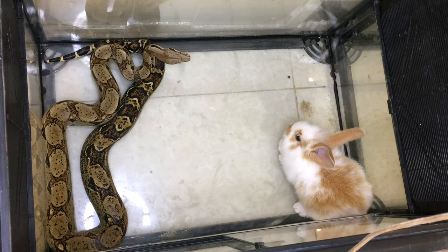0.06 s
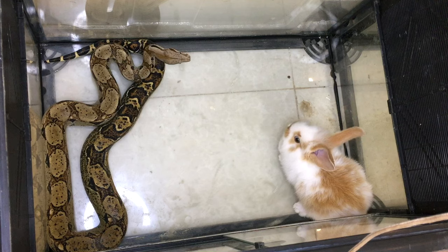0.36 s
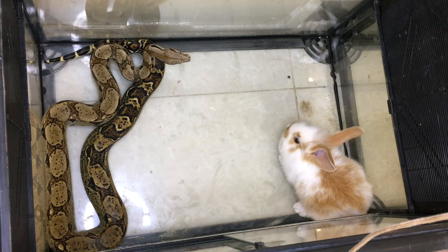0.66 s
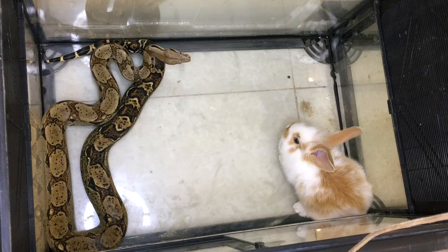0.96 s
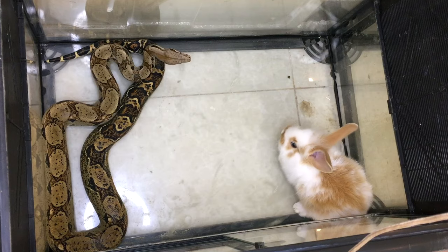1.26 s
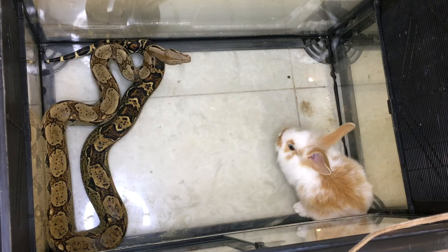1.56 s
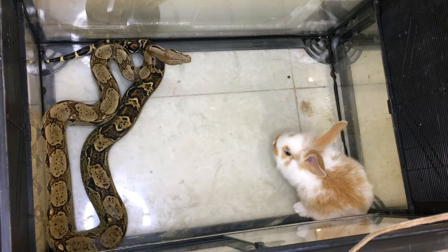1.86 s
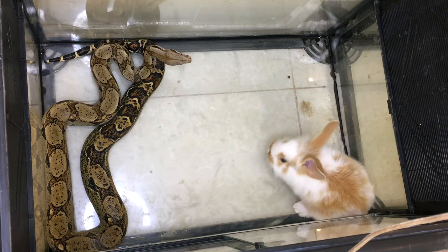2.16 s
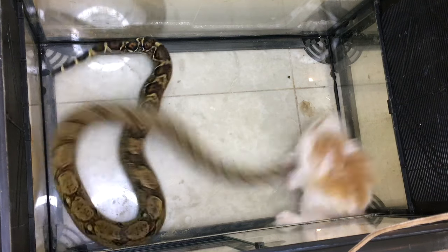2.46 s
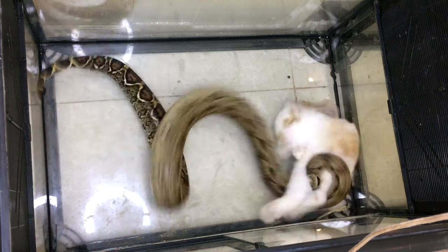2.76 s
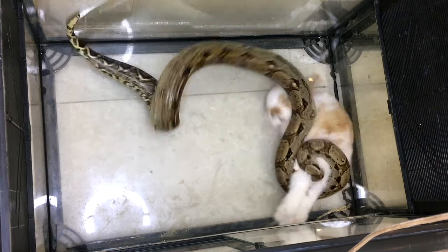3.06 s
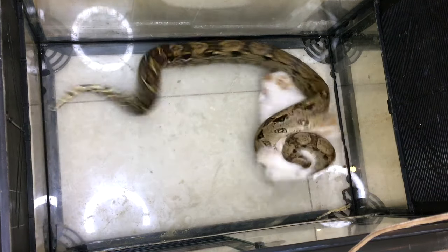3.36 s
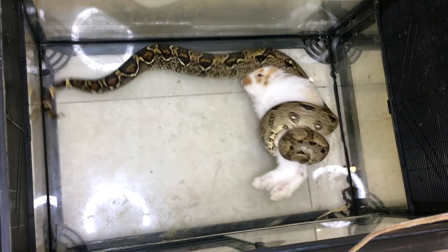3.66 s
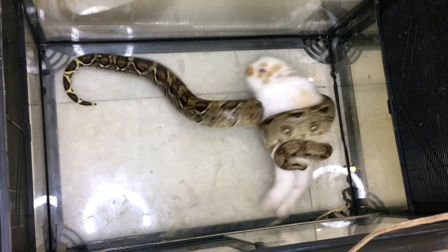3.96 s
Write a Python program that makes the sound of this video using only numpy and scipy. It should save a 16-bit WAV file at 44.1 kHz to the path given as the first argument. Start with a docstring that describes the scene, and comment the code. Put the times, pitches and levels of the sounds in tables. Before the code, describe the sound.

A rabbit squeals in a ringing glass tank. First there is only a low machine hum, then a snake strikes with quick rubbing and knocks on the panes, and three high, partly hoarse squeals follow as the hum fades.

```python
"""A low machine hum fills a room. Then a snake strikes a rabbit in a glass tank: the bodies rub
against the panes (stick-slip friction) and knock on them (impacts that excite decaying modes).
The rabbit squeals three times, its vibrating vocal folds cracking between clear, period-doubled
and hoarse, while the hum sinks away. Reflections keep the tank ringing after every sound in it."""
import sys
import numpy as np
from scipy import signal
from scipy.fft import rfft, irfft, next_fast_len
from scipy.io import wavfile
from scipy.ndimage import uniform_filter1d

SR = 44100
rng = np.random.default_rng(int(sys.argv[2]) if len(sys.argv) > 2 else 0)


def bounce(signal):
    """Save signal as a 16-bit WAV file at the path given by the first command-line argument."""
    frames = np.transpose(np.atleast_2d(signal))
    limited = np.clip(frames, -1, 1)
    pcm = np.round(limited * 32767).astype(np.int16)
    wavfile.write(sys.argv[1], SR, pcm)


N = 176400
TIME = np.arange(N) / SR

# bands of the machine hum (centre [Hz], width [Hz], level [dB])
HUM_BANDS = [(75.9, 7.6, -37.5), (117.2, 18.6, -44.5), (230.7, 8.3, -50.5)]
# spectrum of the air noise (frequency [Hz], relative level [dB])
AIR_SPECTRUM = [(25, -4.5), (60, 20.5), (265, 8.5), (400, -6.5), (2000, -14.5), (3200, -19), (16000, -30)]
# gain of hum and air together (time [s], gain [dB])
ROOM_GAIN = [(2.55, -0.5), (3.2, -16.5)]
# reverberation time of the tank (frequency [Hz], t60 [s])
TAIL_T60 = [(150, 1.5), (2700, 1.25), (6000, 2.1), (8500, 1.1), (16000, .4)]
# spectrum of its reverberation (frequency [Hz], gain [dB])
TAIL_SPECTRUM = [(650, -1), (1400, -4.5), (6300, -4), (8200, -10), (16000, -4.5)]
# low modes of the tank (frequency [Hz], relative level [dB], t60 [s])
BOOM_MODES = [(136.2, -5, 0.96), (168.4, -7, 0.69), (324, -6.5, 0.16), (612.6, -4.5, 0.22),
              (685, -14, 0.58)]
# rubbing on glass during the strike, then a soft low puff of noise under the second squeal
# (time [s], level [dB])
RUB_AND_PUFF_LEVEL = [(2.37, -67), (2.428, -41.5), (2.44, -43.5), (2.515, -29), (2.545, -35.5), (2.69, -46),
                      (2.717, -26.5), (2.737, -42.5), (3.5, -58.5), (3.575, -44), (3.7, -76.5)]
# spectrum of rubbing, puff and cracks (frequency [Hz], relative level [dB])
NOISE_SPECTRUM = [(60, -14), (150, 2), (1000, -5), (2200, -1.5), (3500, -11), (16000, -30.5)]
# first flick of the strike (time [s], level [dB], t60 [s])
FLICK = (2.427, -29.5, 0.21)
# skin squeaking on glass (time [s], length [s], start pitch [Hz], end pitch [Hz], level [dB])
SKIN_SQUEAK = (2.484, .03, 870, 1060, -34)
# blows on the panes (time [s], level [dB], ring [Hz], crack gain [dB], boom gain [dB])
IMPACTS = [(2.453, -32, 2228, 14.5, -27), (2.512, -20.5, 2167, 1, -27.5), (2.526, -28, 358, -12, -16),
           (2.587, -27, 514, 0.5, -1), (2.661, -13.5, 603, -14, -11), (2.708, -24.5, 331, -10, -6.5)]
# a second, whistling tone in the throat (time [s], length [s], pitch [Hz], level [dB])
THROAT_WHISTLES = [(3.548, 0.042, 3500, -16.5), (3.655, 0.011, 3643, -17)]
# one curve per squeal (time [s], pitch [Hz], roughness [0-1], level [dB], throat resonance [Hz])
SQUEALS = [
    [(2.813, 2350, 0.72, -21.5, 4156), (2.852, 2420, 0.69, -22.5, 3700), (2.88, 2569, 0.46, -23.5, 2740),
     (2.915, 2723, 0.03, -18, 2940), (2.952, 2579, 0.18, -18.5, 2870), (2.986, 2264, 0.23, -25.5, 2070),
     (3.048, 2430, 0.13, -33.5, 3920), (3.066, 2603, .1, -26, 6800), (3.078, 2730, 0.16, -15.5, 7900),
     (3.103, 3120, 0.27, -19, 8700), (3.117, 2250, 0, -23, 9650), (3.155, 2498, 0.14, -23, 5200),
     (3.171, 1946, 0.47, -15, 3870), (3.183, 1503, 0.4, -27, 3500)],
    [(3.285, 1900, 0.83, -26, 6860), (3.296, 2257, 0.63, -18, 7070), (3.303, 2750, 0, -14.5, 7800),
     (3.34, 2590, 0.21, -22.5, 6100), (3.35, 2772, 0.2, -13.5, 8900), (3.376, 2920, 0.61, -14.5, 9020),
     (3.41, 2600, 0.41, -20, 5900), (3.432, 2170, 0.59, -19, 4070), (3.457, 2000, 0.5, -24.5, 3820),
     (3.505, 2396, 0.35, -24.5, 4570), (3.522, 2750, 0.22, -15.5, 5630), (3.547, 2814, 0.53, -18, 7380),
     (3.551, 3050, 0.66, -18.5, 6160), (3.591, 3100, 0.83, -18.5, 6900), (3.597, 2820, 0.1, -16, 5550),
     (3.642, 2810, 0.11, -19.5, 6830), (3.658, 2824, 0.62, -19, 6100), (3.682, 2630, 0.69, -17.5, 5670),
     (3.692, 1800, 0.82, -30, 3450)],
    [(3.865, 1741, 0.82, -20.5, 3404), (3.889, 2080, 0.46, -20.5, 4110), (3.92, 2270, 0.44, -29.5, 6220),
     (3.954, 2280, 0.87, -28.5, 5700), (3.969, 2930, 0.48, -16.5, 9200), (3.979, 3346, 0.4, -16.5, 3460),
     (4.0, 3420, 0.08, -10.5, 6800)],
]
# spans in which the folds beat strong-weak (start [s], end [s], depth [0-1])
PERIOD_DOUBLING = [(2.81, 2.857, 0.26), (3.334, 3.42, 0.92), (3.608, 3.635, 0.6)]
# steady part of the throat's filter (frequency [Hz], gain [dB])
THROAT_RESPONSE = [(1200, -26), (2500, 0), (5600, -1), (11000, -5.5), (16000, -13.5)]

WAVER, WAVER_HZ = 0.0167, 111.4  # slow unsteadiness of pitch: relative depth, bandwidth
JITTER, JITTER_HZ = 0.0505, 910  # fast unsteadiness of pitch
SHIMMER, SHIMMER_HZ = 0.17, 157.2  # unsteadiness of amplitude


def amp(db):
    """Amplitude ratio of a level in decibels."""
    return 10 ** (np.asarray(db) / 20)


def unit(x):
    """Normalisation to an rms of 1."""
    return x / np.sqrt(np.mean(x ** 2) + 1e-20)


def read(points, hz):
    """Interpolation on a logarithmic frequency axis."""
    f, value = np.transpose(points)
    return np.interp(np.log(hz + 1), np.log(f), value)


def follow(rows, t):
    """Linear interpolation of each column at times t."""
    s, *columns = np.transpose(rows)
    return [np.interp(t, s, c) for c in columns]


def shape(x, gain):
    """Filtering: the spectrum is multiplied by gain(frequency)."""
    size = next_fast_len(len(x) + 4096)
    return irfft(rfft(x, size) * gain(np.fft.rfftfreq(size, 1 / SR)), size)[:len(x)]


def noise(count, gain):
    """Filtered white noise with an rms of 1."""
    return unit(shape(rng.standard_normal(count), gain))


def wobble(count, hz):
    """Random modulation: noise low-passed at hz."""
    return noise(count, lambda f: 1 / (1 + (f / hz) ** 2))


def add(mix, s, sound):
    """Superposition of a sound from time s."""
    part = mix[round(s * SR):][:len(sound)]
    part += sound[:len(part)]


def fade(t, t60):
    """Exponential decay, 60 dB in t60 seconds."""
    return np.exp(-np.log(1000) * t / t60)


def chirp(length, from_hz, to_hz, db):
    """Frequency modulation: a short sine tone glides and wavers."""
    hz = np.linspace(from_hz, to_hz, int(length * SR))
    hz = hz + hz * WAVER * wobble(len(hz), SHIMMER_HZ)
    return amp(db) * unit(signal.windows.tukey(len(hz), .5) * np.sin(2 * np.pi * np.cumsum(hz) / SR))


def room():
    """Narrow-band noise beats within itself: a wavering machine hum, over faint broadband air."""
    hum = sum(amp(db) * noise(N, lambda f: np.exp(-((f - hz) / width) ** 2))
              for hz, width, db in HUM_BANDS)
    air = amp(-48.5) * noise(N, lambda f: amp(read(AIR_SPECTRUM, f)))
    return (hum + air) * amp(follow(ROOM_GAIN, TIME)[0])


def tank(x):
    """Reverberation by convolution: early reflections between the panes, then a long glassy tail."""
    hz, t, spectrum = signal.stft(rng.standard_normal(2 * SR), SR, nperseg=256)
    decay = fade(t, read(TAIL_T60, hz)[:, None])
    decay *= amp(read(TAIL_SPECTRUM, hz))[:, None] / np.sqrt((decay ** 2).mean(1, keepdims=True) * 2 * SR)
    tail = signal.istft(spectrum * decay, SR, nperseg=256)[1]
    early = rng.standard_normal(len(tail)) * fade(TIME[:len(tail)], t60=0.032)
    return x + signal.fftconvolve(x, tail + amp(-6.5) * early / np.linalg.norm(early))[:N]


def scuffle_and_puff(grains_per_s=2800, spread_db=2.5):
    """Stick-slip rubbing on glass in the strike, with a flick and a squeak; later a soft low puff."""
    grains = (rng.random(N) < grains_per_s / SR) * rng.standard_normal(N)
    grains *= amp(spread_db * np.minimum(rng.exponential(1, N), 4))
    grainy = unit(shape(grains, lambda f: amp(read(NOISE_SPECTRUM, f))))
    out = grainy * amp(follow(RUB_AND_PUFF_LEVEL, TIME)[0]) * (TIME > RUB_AND_PUFF_LEVEL[0][0])
    s, db, t60 = FLICK
    add(out, s, amp(db) * rng.standard_normal(N) * fade(TIME, t60))
    add(out, SKIN_SQUEAK[0], chirp(*SKIN_SQUEAK[1:]))
    return out


def knock(db, hz, crack_db, boom_db, rise_s=0.0016, settle_s=0.0029):
    """Impact excitation: a body sets off a pane's local ring, a crack and the tank's low modes."""
    t = np.arange(SR) / SR
    ring_hz = hz + hz * 0.445 * np.exp(-t / settle_s)  # the pane rings sharp while pressed
    ring = np.sin(2 * np.pi * np.cumsum(ring_hz) / SR) * fade(t, t60=0.088)
    crack = noise(SR, lambda f: amp(read(NOISE_SPECTRUM, f))) * fade(t, t60=0.081)
    boom = sum(amp(mode_db) * np.sin(2 * np.pi * (f * t + rng.random())) * fade(t, t60)
               for f, mode_db, t60 in BOOM_MODES)
    return amp(db) * np.minimum(t / rise_s, 1) * (ring + .5 * amp(crack_db) * crack + amp(boom_db) * boom)


def vocal_folds(t, hz, rough):
    """Self-sustained oscillation: harmonics that jitter and give way to air noise as roughness rises."""
    jitter = JITTER * rough * wobble(len(t), JITTER_HZ)
    waver = WAVER * np.sqrt(rough) * wobble(len(t), WAVER_HZ)
    phase = 2 * np.pi * np.cumsum(hz * (1 + jitter + waver)) / SR
    # period doubling adds partials halfway between the harmonics
    doubling = sum(depth * ((t > start) & (t < end)) for start, end, depth in PERIOD_DOUBLING)
    doubling = uniform_filter1d(doubling, size=200)
    partials = sum((k * hz < SR / 2)
                   * (np.cos(k * phase + k * k) + doubling * np.cos((k + .5) * phase + k * k))
                   for k in range(1, 9))
    rasp = 0.53 * rough * rng.standard_normal(len(t))
    return (1 - rough) * unit(partials) + rasp


def throat(source, curve, peak_db=13.5, half_width_hz=344, bright_hz=5330):
    """A moving resonance lifts the nearest partial; the higher it lies, the stronger the treble."""
    f, t, spectrum = signal.stft(source, SR, nperseg=256)
    f = f[:, None]
    peak_hz = follow(curve, curve[0][0] + t)[-1]
    gain_db = read(THROAT_RESPONSE, f) + peak_db / (1 + ((f - peak_hz) / half_width_hz) ** 2)
    gain_db += 6.5 * np.log2(peak_hz / bright_hz) * np.clip(f / bright_hz - .5, 0, 1)
    return signal.istft(spectrum * amp(gain_db), SR)[1][:len(source)]


def squeal(curve, attack_s=0.0077, release_s=0.0057, gain_db=-1.49):
    """Source and filter: the rabbit's tight vocal folds sound through its throat."""
    t = np.arange(curve[0][0], curve[-1][0] + release_s, 1 / SR)
    hz, rough, db, _ = follow(curve, t)
    voice = throat(vocal_folds(t, hz, np.clip(rough, 0, 1)), curve)
    voice /= np.sqrt(abs(uniform_filter1d(voice ** 2, size=400)) + 1e-9)  # short-term rms of 1
    gate = np.clip((t - t[0]) / attack_s, 0, 1) * np.clip((t[-1] - t) / release_s, 0, 1)
    shimmer = 1 + SHIMMER * wobble(len(t), SHIMMER_HZ)
    return voice * gate * amp(db + gain_db) * shimmer


def scene():
    """Superposition: the struggle reverberates in the tank, and the room adds its hum."""
    inside = scuffle_and_puff()
    for s, *impact in IMPACTS:
        add(inside, s, knock(*impact))
    for curve in SQUEALS:
        add(inside, curve[0][0], squeal(curve))
    for s, length, hz, db in THROAT_WHISTLES:
        add(inside, s, chirp(length, hz, hz, db))
    return (tank(inside) + room())[None]


def record(dry):
    """Band limiting: a low-pass filter removes the highest treble."""
    low_pass = signal.firwin(511, cutoff=15900, window=("kaiser", 9), fs=SR)
    return signal.oaconvolve(dry, low_pass[None], "same")


dry = scene()
out = record(dry)
bounce(out)
```